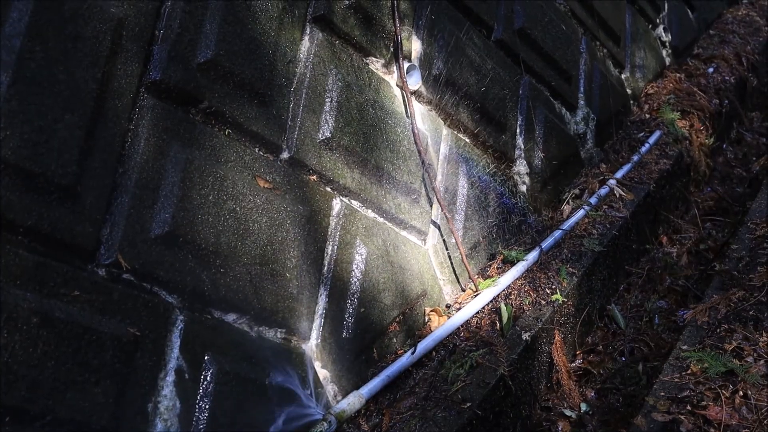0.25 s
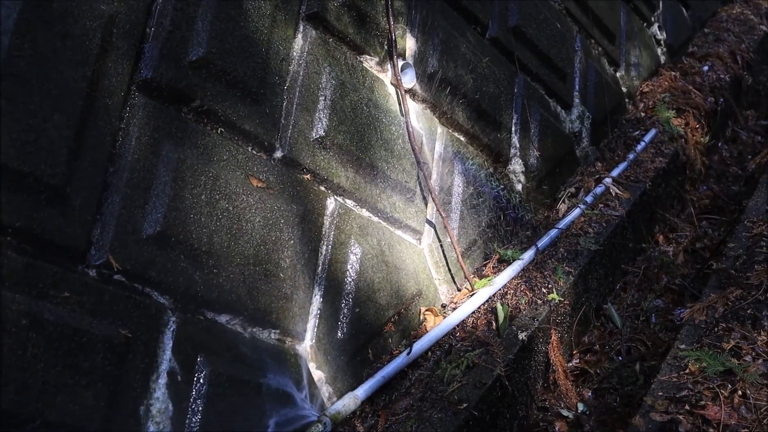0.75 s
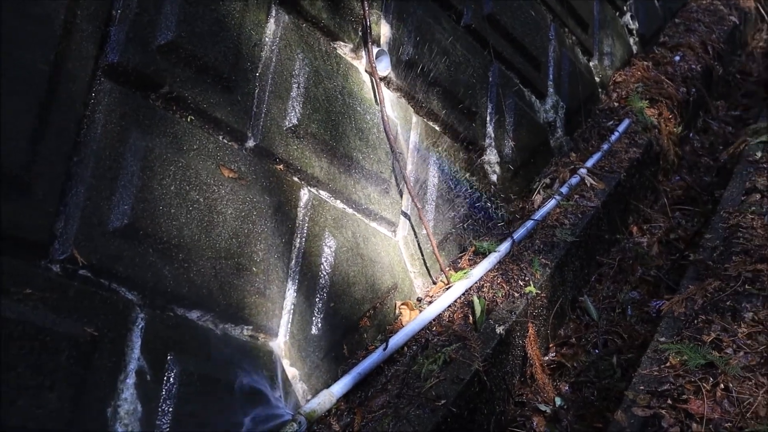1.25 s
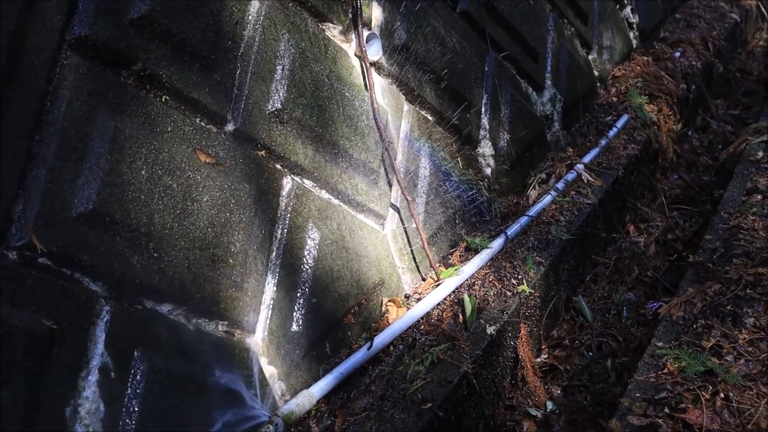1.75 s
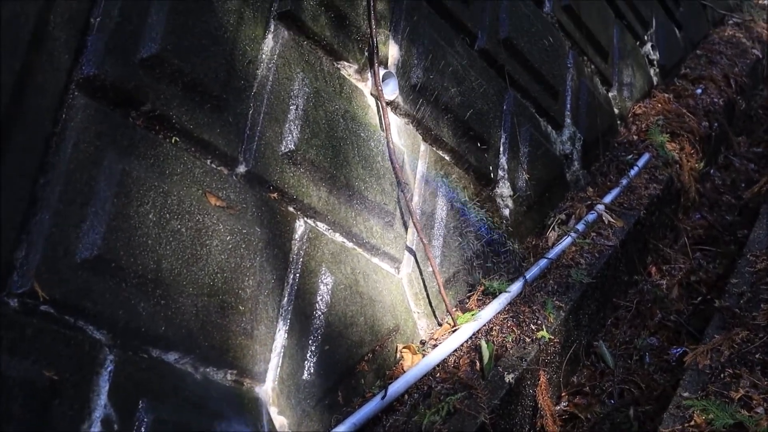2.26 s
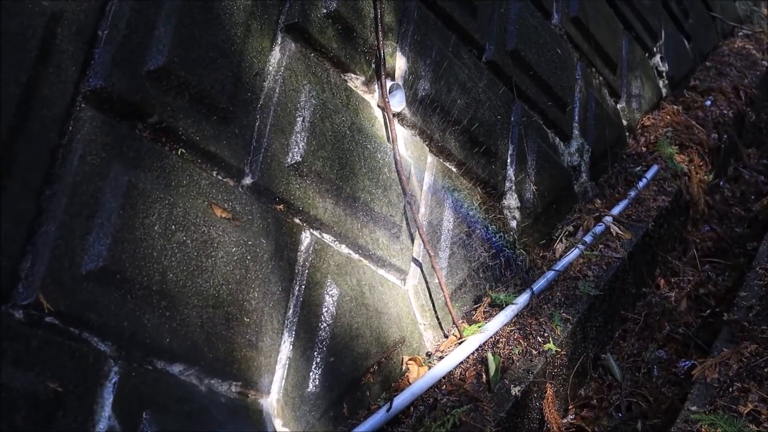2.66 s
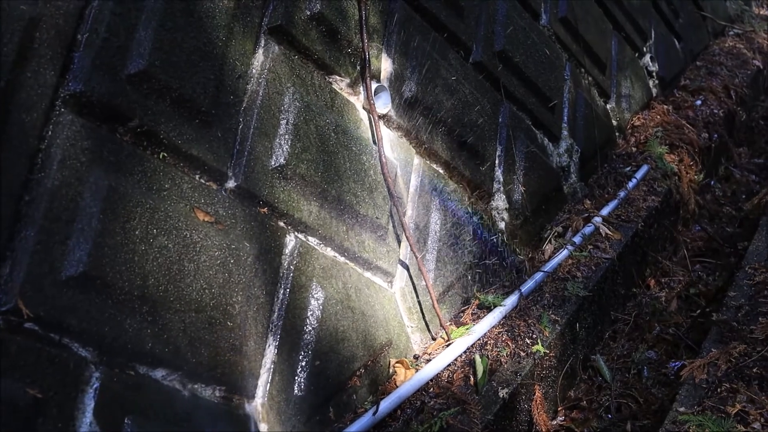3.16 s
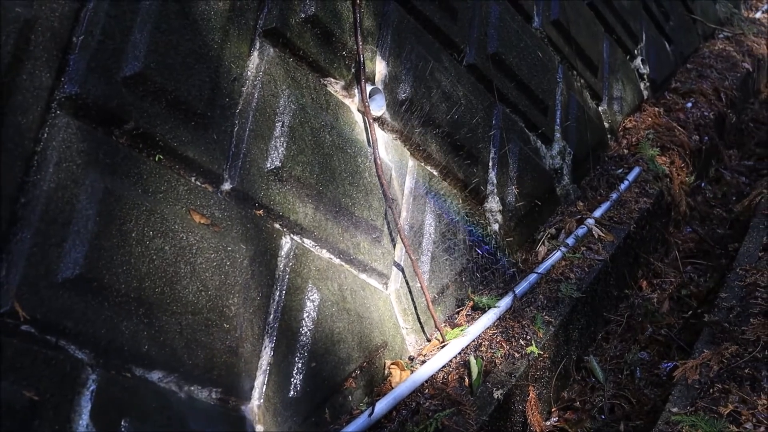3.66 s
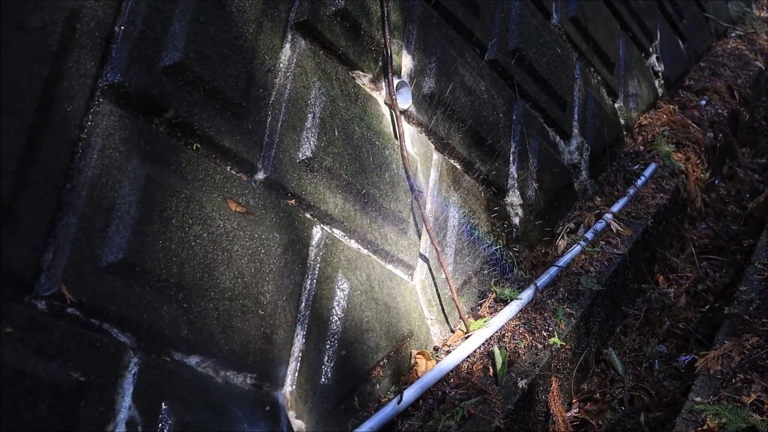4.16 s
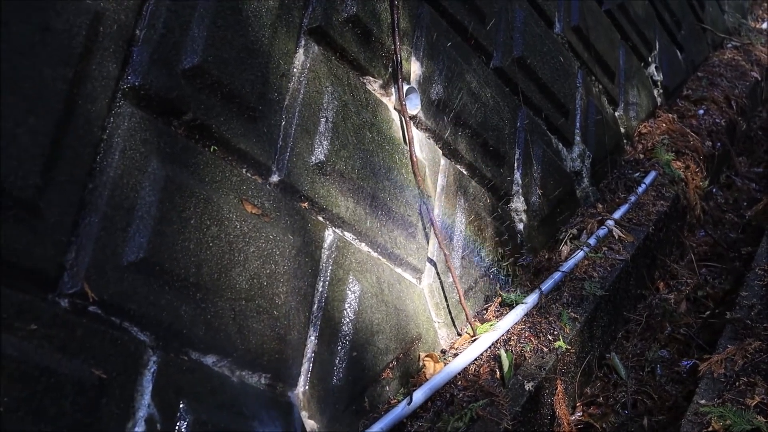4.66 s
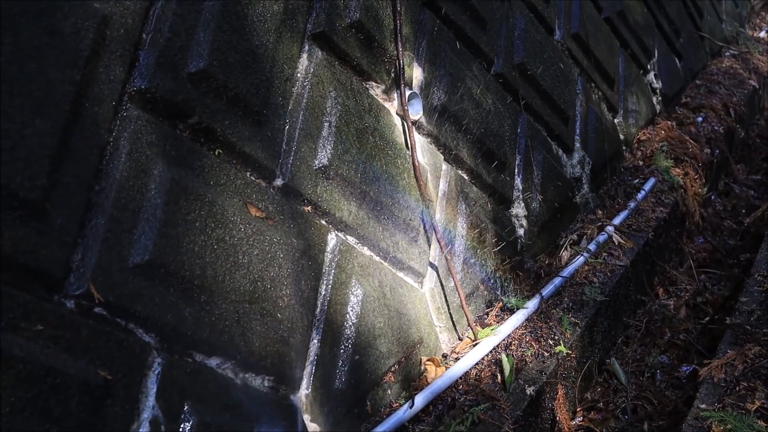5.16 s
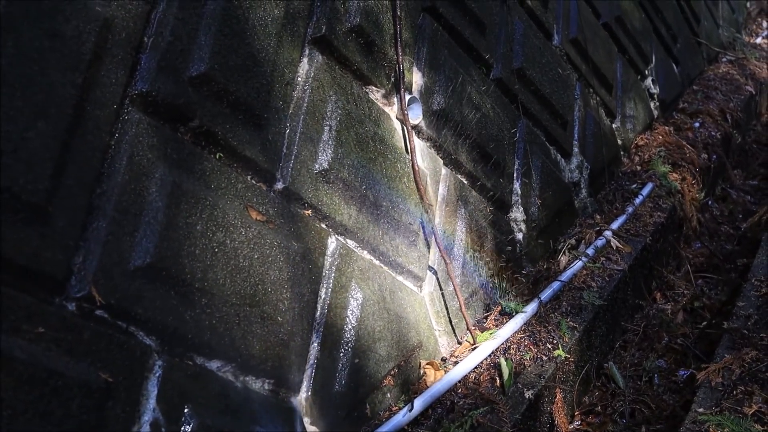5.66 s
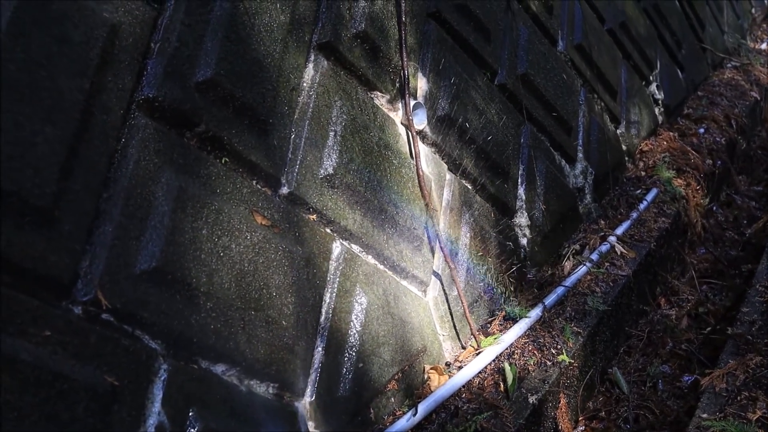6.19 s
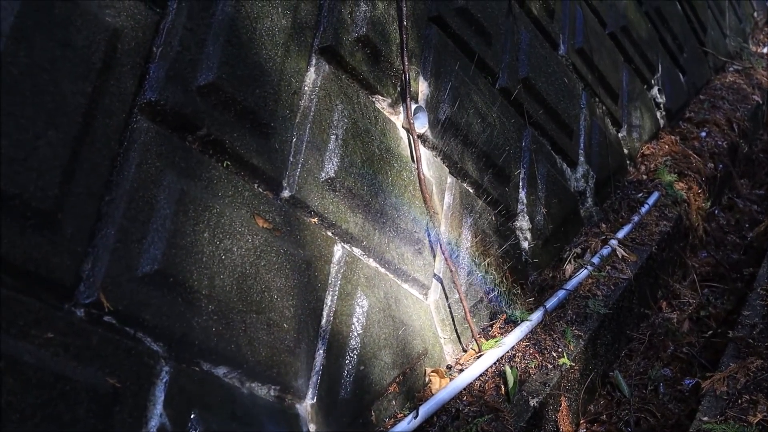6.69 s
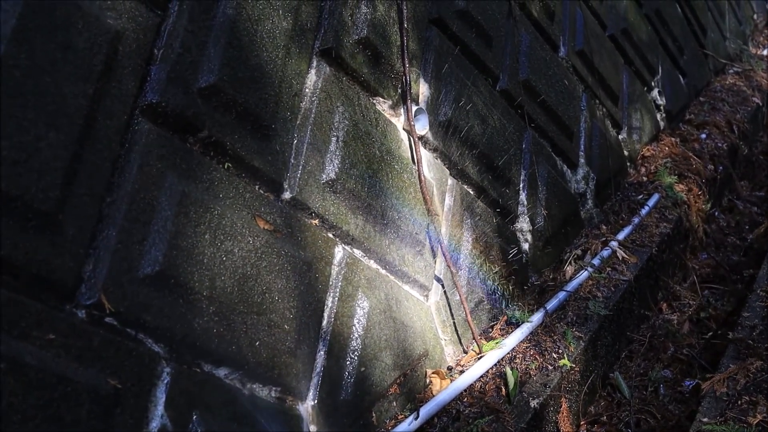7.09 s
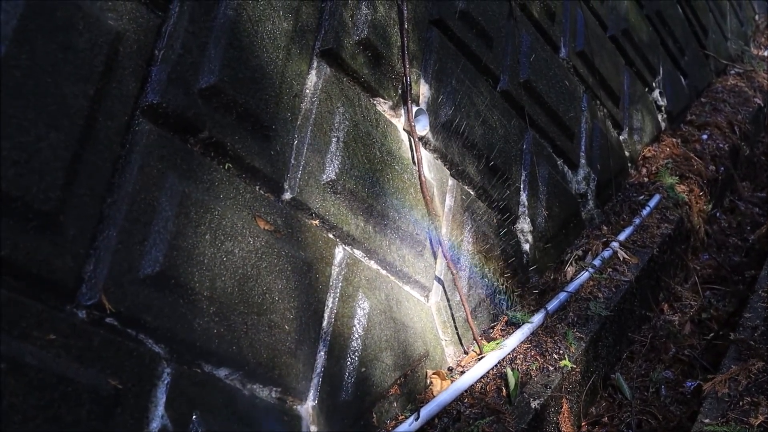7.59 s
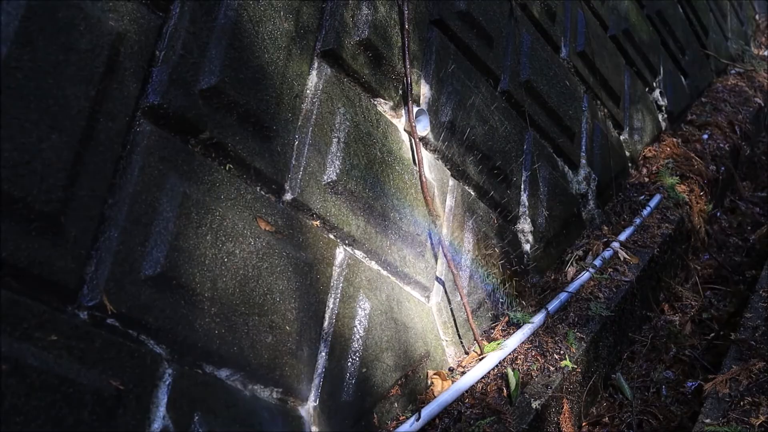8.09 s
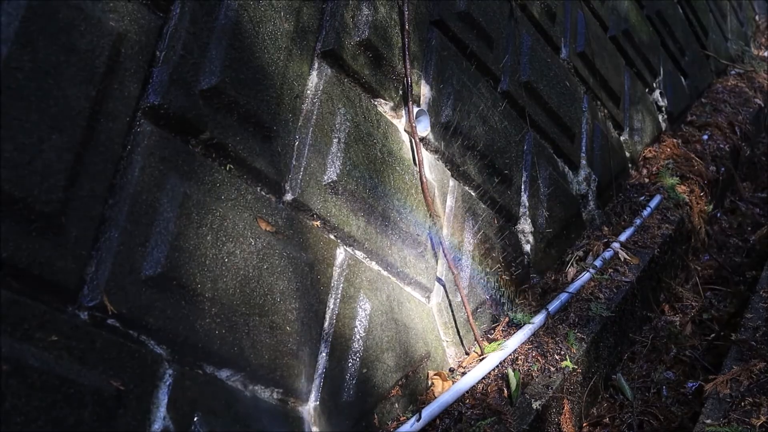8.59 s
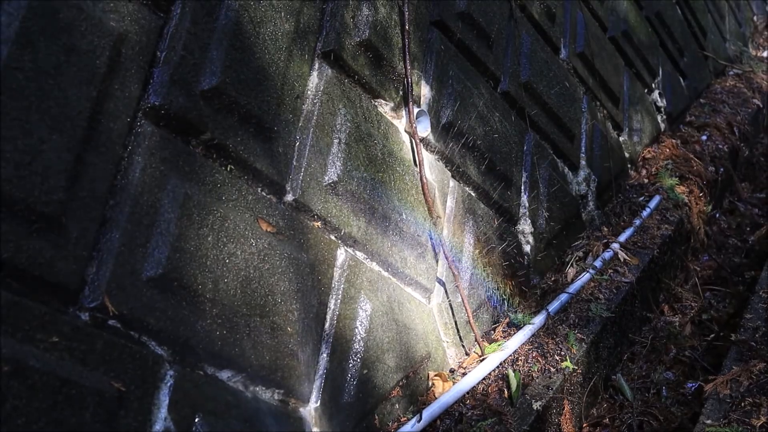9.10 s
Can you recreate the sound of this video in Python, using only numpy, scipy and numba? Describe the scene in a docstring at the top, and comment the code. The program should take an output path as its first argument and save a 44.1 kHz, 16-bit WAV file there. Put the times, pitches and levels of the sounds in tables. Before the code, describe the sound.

Water sprays from tiny holes in a garden pipe, making a steady high hiss and a dense patter on a block wall and fallen leaves. Bigger drops pop among the fine ticks. About two seconds in, the hand-held microphone takes a short, low bump. The spray carries on over a faint outdoor rumble, with big drops coming more often, then cuts off abruptly.

```python
"""From the start, fine jets from pinholes in a garden pipe hiss as mist and spatter on a block wall and
leaf litter: thousands of droplets a second tick over a low outdoor rumble, and big drops pop among them.
Over the first seconds a hand-held camera draws nearer and the spatter brightens a little. Near 2 s a
cluster of knocks rings its shell and rocks it; then the trembling grip gradually settles.
Big drops come more often in the second half, and at 9.1 s the sound is cut off."""
import sys
import numpy as np
from scipy import signal
from scipy.fft import rfft, irfft, next_fast_len
from scipy.io import wavfile
from scipy.ndimage import uniform_filter1d
from numba import njit

SR = 44100
rng = np.random.default_rng(int(sys.argv[2]) if len(sys.argv) > 2 else 0)


def wav_out(sig):
    """Save sig, one row per channel (or a flat mono array), as 16-bit PCM at SR to the path in sys.argv[1]."""
    wavfile.write(sys.argv[1], SR, np.round(np.clip(np.atleast_2d(sig).T, -1, 1) * 32767).astype(np.int16))


N = 411894
T = np.arange(N) / SR
FFT_SIZE = next_fast_len(N + 8192)
HZ = np.maximum(np.fft.rfftfreq(FFT_SIZE, 1 / SR), 1)
CUT_S, TOP_HZ = 9.1243, 15720

# Stereo width: f/Hz, side level relative to mid/dB
SIDE_LEVEL = [(60, -1), (150, -19), (500, -35.5), (1300, -23), (2000, -20.5), (2600, -11), (3700, -6.5),
              (4200, -13), (4900, -22), (5700, -10.5), (7400, -6.5), (8600, 2.5), (9400, -7.5),
              (10400, -10.5), (15500, -9.5)]
# Coherence of side with mid: f/Hz, coherence (0-1), phase/rad
SIDE_COHERENCE = [(300, .1, 0), (1800, .27, -.3), (3000, .55, -.45), (4100, .25, -1.4), (4700, .05, -.8),
                  (6000, .25, 0), (8000, .3, -.3), (9300, .35, -2.2), (10500, .15, -2.6),
                  (12000, .25, -1.8), (15500, .18, -1.4)]
# Spectrum of far rumble and of air on the microphone ports: f/Hz, relative level/dB
AIR_SPECTRUM = [(12, -25), (20, 2), (38, -4.5), (60, -3), (97, -3), (139, -1.5), (292, -3), (437, -8),
                (500, -1), (650, -35.5), (1100, -120)]
# Modes of the camera shell: f/Hz, relative level/dB, T60/s
SHELL_MODES = [(266, -3.5, 0.035), (493, -6.5, 0.037), (345, -9.5, .03)]
# Knocks on the camera: t/s, shell gain/dB, sway gain/dB, contact time/ms, left minus right/dB,
# pitch factor from the squeeze of the hand
CAMERA_KNOCKS = [(0.70, -58, -38, 5, -4, 1.01), (0.885, -46, -39, 3.6, 0, 1.01),
                 (1.215, -32, -60, 2.3, -6, 1.15), (1.715, -60, -36, 5, 0, 1.01),
                 (1.9535, -28.5, -57, .5, 9, 1.3), (1.9575, -38, -17, 4, -3.5, 1.01),
                 (1.966, -26.5, -37, 1.4, -8.5, 0.97), (1.969, -44, -21.5, 3.2, 4.5, 1.01),
                 (1.9786, -8, -35.5, 2, 1, 1.01), (1.9864, -22, -35, .9, 5, 1.15),
                 (2.008, -31, -43, 1.4, -7, 1.1), (2.011, -24, -42, 1.8, 4, 1.25),
                 (2.018, -30, -43, 1.6, 9, 1.28), (3.669, -36, -60, 1.6, -17, 1.21),
                 (8.325, -65, -42, 5, -7, 1.01), (8.456, -63, -47, 6, 0, 1.01)]
# Trembling of the grip: t/s, level/dB
GRIP_LEVEL = [(0, -66.5), (.8, -59.5), (1.5, -57), (1.9, -49.5), (2.05, -57.5), (2.2, -55), (2.6, -62),
              (3.4, -58), (3.8, -67), (4.3, -61.5), (4.7, -63.5), (6.1, -67), (6.8, -59), (7.6, -68.5),
              (9.1, -70)]
# Spray as the camera nears: t/s, then level/dB of dull leaf splash, mid spatter, bright spatter, mist
SPRAY_LEVELS = [(0, -60.5, -38.5, -44.5, -37.5), (1.2, -57, -38.5, -45, -36.5),
                (1.48, -51.5, -37.5, -41.5, -36.5), (1.7, -57, -38, -42.5, -36.6),
                (2.2, -57.5, -37.5, -42, -36.5), (3.6, -57.5, -37.5, -41.5, -36.5),
                (4.8, -58, -37.5, -43.5, -36.5), (6.2, -57.5, -37, -43.5, -36.5),
                (7.3, -57.5, -36.5, -43.5, -37), (7.8, -58, -37, -44, -36.6), (9.1, -58, -37, -43, -36.5)]
# Spectrum of the mist: f/Hz, relative level/dB
MIST_SPECTRUM = [(3240, -20), (5500, -2), (5930, -2.5), (6680, -1), (7270, -4.5), (8440, -7), (9470, -3.5),
                 (10600, 2), (11300, 0), (13200, -4), (14300, -4), (15300, -6), (16000, -10.5)]
# The loudest drops: t/s, level/dB, period of the pressure swing/ms
BIG_DROPS = [(0.3847, -24.5, 0.67), (0.561, -15, 0.43), (0.6256, -21, .22), (0.9199, -23, .32),
             (0.9238, -18, 0.34), (0.9748, -18, .31), (1.1365, -25, .34), (1.5354, -20, 0.4),
             (1.8229, -23, 0.52), (2.2717, -28, .42), (2.6742, -19, .26), (3.563, -21.5, 0.6),
             (3.8958, -14, 0.28), (4.2396, -19, .41), (5.0112, -22, 0.41), (5.075, -18, 0.27),
             (5.2497, -18, .29), (5.3178, -20, 0.39), (5.483, -22, 0.41), (5.826, -22, 0.37),
             (5.9658, -15, 0.35), (6.0936, -15.5, 0.37), (6.182, -22.5, 0.74), (6.5167, -23, .32),
             (6.738, -14.5, .37), (7.022, -21, 0.49), (7.0371, -17.5, 0.34), (7.1047, -21, 0.49),
             (7.1144, -19, .42), (7.1914, -16, 0.34), (7.3077, -21, 0.23), (7.472, -19, .24),
             (7.4883, -20.5, .45), (7.5056, -18, 0.31), (7.5398, -17.5, .24), (7.9162, -20, 0.25),
             (7.9445, -21, 0.37), (8.0249, -16, .3), (8.0382, -16.5, .39), (8.2623, -19, .39),
             (8.449, -17, 0.45), (8.505, -18, 0.38), (8.5988, -25.5, 0.77), (8.8076, -19, 0.4),
             (8.8753, -23, .28), (9.0129, -22, .24), (9.06, -22, 0.44)]
# Reflections of a drop from wall, ground and camera: delay/ms, gain/dB
REFLECTIONS = [(.6, -10.5), (1.15, -6.5), (1.851, -9), (2.9, -28), (4.1, -15)]
# Spectrum of droplets on stone, coloured by wall echo and microphone: f/Hz, relative level/dB
SPATTER_SPECTRUM = [(210, -51), (350, -17), (689, -12.5), (1640, -4), (2080, -2.5), (2710, -0.5),
                    (4000, -6), (4400, -3.5), (5080, -2), (6000, -21.5), (7800, -33), (13200, -120)]
# Narrow resonances, likely hollows of the wall and microphone housing: f/Hz, bandwidth/Hz, gain/dB
CAVITY_MODES = [(1280, 110, 4.5), (1665, 120, 2.5), (2317, 180, 2.5), (2716, 160, 2.5), (3150, 140, 2.5),
                (3470, 150, 3), (4430, 130, 4.5), (4950, 220, 1.5), (5450, 150, 6.5)]


def undb(db):
    """Amplitude ratio of a level in decibels."""
    return np.exp(np.asarray(db) * (np.log(10) / 20))


def at_level(x, db):
    """Scaling to a given RMS level."""
    return x * undb(db) / np.sqrt(np.mean(x ** 2))


def along_hz(table, column=1):
    """Interpolation of one column on a log-frequency axis."""
    table = np.array(table)
    return np.interp(np.log(HZ), np.log(table[:, 0]), table[:, column])


def minimum_phase(db):
    """Causal response of a level curve, by folding its cepstrum."""
    cepstrum = irfft(db * np.log(10) / 20, FFT_SIZE)
    cepstrum[1:FFT_SIZE // 2] *= 2
    cepstrum[FFT_SIZE // 2 + 1:] = 0
    return np.exp(rfft(cepstrum))


def wander(rate):
    """Smooth random modulation of unit deviation, drawn rate times a second."""
    steps = uniform_filter1d(np.repeat(rng.standard_normal(int(N / SR * rate) + 2), 4), 4)
    curve = np.interp(T * rate * 4, np.arange(len(steps)), steps)
    return curve / curve.std()


def stereo_spectra(centre, aside, response):
    """Partial coherence: left and right are mid plus and minus a side that partly follows the mid."""
    mid = rfft(centre, FFT_SIZE)
    coherence = np.clip(along_hz(SIDE_COHERENCE), 0, 1)
    coherent = coherence * np.exp(1j * along_hz(SIDE_COHERENCE, column=2)) * mid
    diffuse = np.sqrt(1 - coherence ** 2) * rfft(aside, FFT_SIZE)
    side = undb(along_hz(SIDE_LEVEL)) * (coherent + diffuse)
    return response * np.array([mid + side, mid - side])


def bands(spectra, centres_hz):
    """Complementary filtering: overlapping bands that sum to the whole."""
    for peak in np.eye(len(centres_hz)):
        yield irfft(spectra * np.interp(np.log(HZ), np.log(centres_hz), peak), FFT_SIZE)[:, :N]


def damped_mode(hz, t60_s, length_s=.15):
    """Free vibration: a sinusoid that decays exponentially."""
    t = np.arange(int(length_s * SR)) / SR
    return np.sin(2 * np.pi * hz * t) * np.exp(-np.log(1000) * t / t60_s)


def add(out, start_s, sound, pan_db):
    """Superposition of a sound, placed by its left-right level difference."""
    i = int(start_s * SR)
    out[:, i:i + len(sound)] += sound * undb(np.array([[pan_db], [-pan_db]]) / 2)


def outdoor_air(level_db=-61):
    """Amplitude-modulated noise: far rumble and air on the ports swell in three low bands."""
    noise = stereo_spectra(*rng.standard_normal((2, N)), undb(along_hz(AIR_SPECTRUM)))
    return at_level(sum(band * undb(0.86 * wander(5)) for band in bands(noise, [40, 130, 400])), level_db)


def knocks():
    """Impact excitation: a push rings the shell and rocks the camera; longer contact sounds duller."""
    sway = damped_mode(hz=95.3, t60_s=0.08)
    no_bass = signal.butter(1, 90, "high", fs=SR, output="sos")  # a small shell carries no bass
    out = np.zeros((2, N))
    for start_s, shell_db, sway_db, contact_ms, pan_db, pitch in CAMERA_KNOCKS:
        modes = sum(undb(db) * damped_mode(hz * pitch, t60_s) for hz, db, t60_s in SHELL_MODES)
        response = undb(shell_db) * signal.sosfilt(no_bass, modes) + undb(sway_db) * sway
        push = np.hanning(int(contact_ms * SR / 1000) + 3)
        add(out, start_s, -np.convolve(push / push.sum(), response), pan_db)
    return out


def grip_tremor(rocking_hz=98, waver_hz=12):
    """Forced vibration: an unsteady hand keeps the camera rocking at a wavering pitch and level."""
    phase = 2 * np.pi * np.cumsum(rocking_hz + waver_hz * wander(45)) / SR
    swell_db = 3 * wander(24) + 1.5 * wander(8)
    shake = [undb(swell_db + 2 * wander(25)) * np.sin(phase + 0.97 * wander(12)) for _ in range(2)]
    return at_level(np.array(shake), 0) * undb(np.interp(T, *np.transpose(GRIP_LEVEL)))


def handling():
    """Structure-borne sound: knocks and tremor reach a capsule that rejects the deepest bass."""
    return signal.sosfilt(signal.butter(2, 55, "high", fs=SR, output="sos"), knocks() + grip_tremor())


def mist(level_db, shade_db=(0.5, -2, -.3, -0.5), approach_s=2.5):
    """Atomisation: the jets tear into mist, giving smooth treble noise with a slight flutter."""
    noise = stereo_spectra(*rng.standard_normal((2, N)), undb(along_hz(MIST_SPECTRUM)))
    flutter_db = 0.33 * wander(30)
    far = np.exp(-T / approach_s)  # the gap near 8 kHz fills as the camera nears
    hiss = sum(band * undb(db * far + flutter_db + 0.45 * wander(12))
               for band, db in zip(bands(noise, np.geomspace(6000, 15000, 4)), shade_db))
    return at_level(hiss, 0) * undb(level_db)


def big_drops(soft_count=40, phase_rad=.8, width_periods=.48):
    """Impact and reflection: a drop flattens in one pressure swing, slower if larger, then echoes."""
    out = np.zeros((2, N))
    ms = np.arange(-88, 89) * 1000 / SR
    window = np.hanning(len(ms))
    when, softness, size = rng.random((soft_count, 3)).T
    soft_periods_ms = np.interp(size ** 2, [0, 1], [0.26, 0.82])
    soft_drops = np.transpose([0.0092 + when * CUT_S, -24 - 8 * softness, soft_periods_ms])
    for t, db, period_ms in np.vstack([soft_drops, BIG_DROPS]):
        envelope = undb(db) * np.exp(-(ms / (width_periods * period_ms)) ** 2)
        pop = envelope * np.cos(2 * np.pi * ms / period_ms + phase_rad)
        pop -= pop.sum() * window / window.sum()  # no net push
        pan_db = rng.normal(2.5, 2.5)  # mostly left of centre
        for delay_ms, gain_db in [(0, 0), *REFLECTIONS]:
            add(out, t + (ms[0] + delay_ms) / 1000, pop * undb(gain_db), pan_db)
    return out


@njit
def droplet_ticks(start, hz, cycles, amplitude, aside):
    """Damped oscillation: each tick falls 60 dB over its cycles; row 1 is its share off centre."""
    out = np.zeros((2, N + 4096))
    for k in range(len(start)):
        pole = np.exp((2j * np.pi - np.log(1000) / cycles[k]) * hz[k] / SR)
        phasor = amplitude[k] + 0j
        for i in range(start[k], start[k] + min(int(cycles[k] * SR / hz[k]), 4096)):
            phasor *= pole
            out[0, i] += phasor.imag
            out[1, i] += phasor.imag * aside[k]
    return out[:, :N]


def spatter(dull_db, mid_db, bright_db, count=60000, finest_db=4):
    """Shot noise: droplets land at random, and each band flickers as the jets wander."""
    when, pitch, size, ringing, direction = rng.random((count, 5)).T
    hz = 400 + 6500 * pitch
    amplitude = undb(np.minimum(-3.5 * np.log(1 - size), 10)) * np.sqrt(hz)
    cycles = 2.36 + 16 * ringing ** 3  # most tick, a few trap air and ring on
    aside = np.sqrt(2) * np.cos(np.pi * direction)
    ticks = at_level(droplet_ticks((when * N).astype(np.int64), hz, cycles, amplitude, aside), 0)
    finest = undb(finest_db) * rng.standard_normal((2, N))  # the finest spray merges into noise
    cavities_db = sum(db / (1 + (2 * (HZ - f) / width) ** 2) for f, width, db in CAVITY_MODES)
    spectra = stereo_spectra(*(ticks + finest), minimum_phase(along_hz(SPATTER_SPECTRUM) + cavities_db))
    shared_db = 0.14 * wander(14)
    dull, *mids, bright = [band * undb(shared_db + 0.35 * wander(9) + 0.81 * wander(40))
                           for band in bands(spectra, [650, 1000, 1500, 2300, 3300, 4800])]
    groups = [(dull, dull_db), (sum(mids), mid_db), (bright, bright_db)]
    return sum(at_level(part, 0) * undb(db) for part, db in groups)


def scene(surge_db=0.34):
    """Superposition of all sources; the spatter surges as the jets swell and slacken at random."""
    times, *columns = np.transpose(SPRAY_LEVELS)
    *spatter_db, mist_db = (np.interp(T, times, column) for column in columns)
    droplets = spatter(*(db + surge_db * wander(6) for db in spatter_db))
    return droplets + mist(mist_db) + big_drops() + handling() + outdoor_air()


def record(dry):
    """Gating and band limiting: the sound stops abruptly, and a steep low-pass removes the top."""
    return signal.sosfilt(signal.ellip(12, .2, 80, TOP_HZ, fs=SR, output="sos"), dry * (T < CUT_S))


dry = scene()
out = record(dry)
wav_out(out)
```